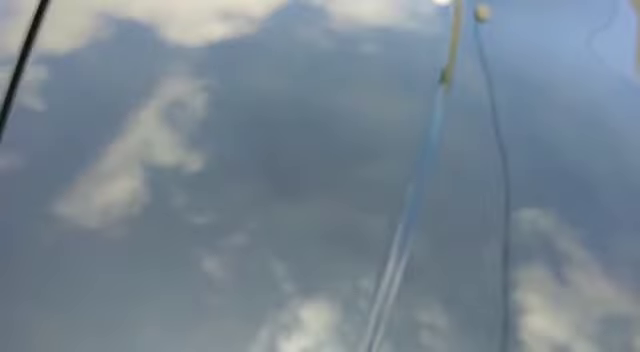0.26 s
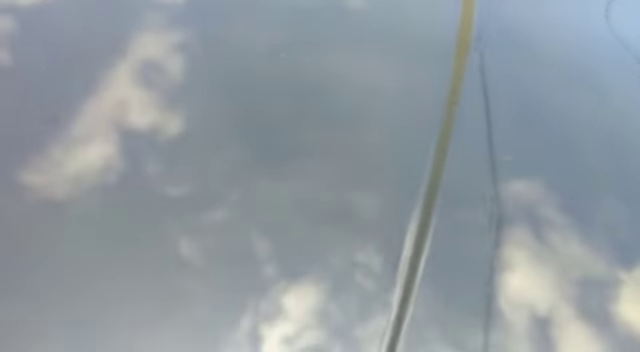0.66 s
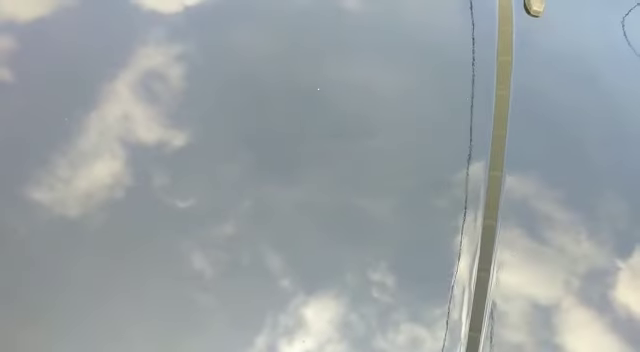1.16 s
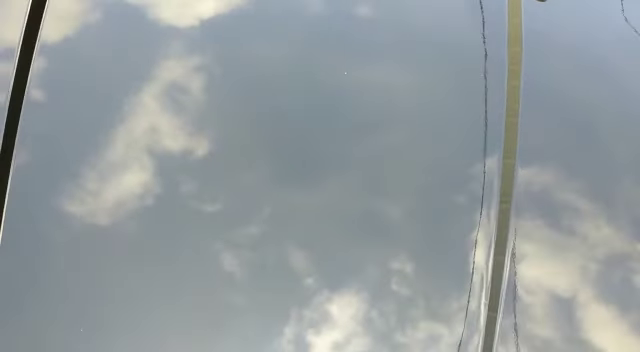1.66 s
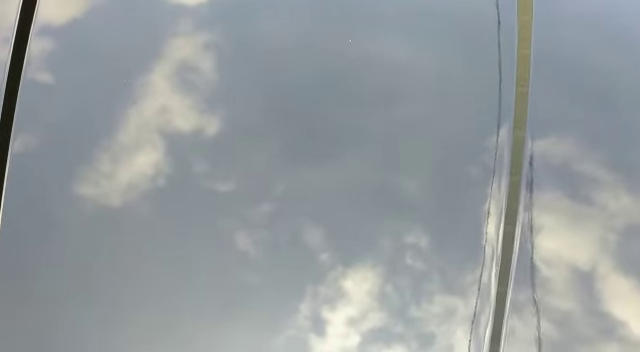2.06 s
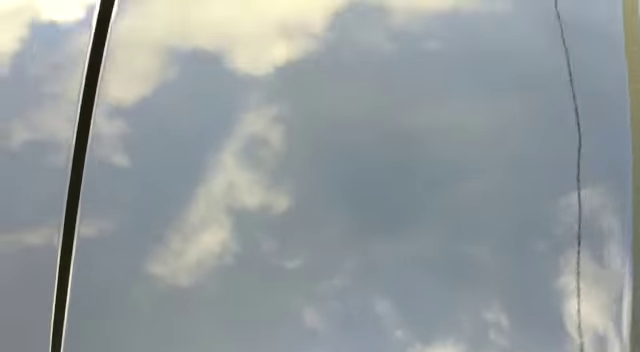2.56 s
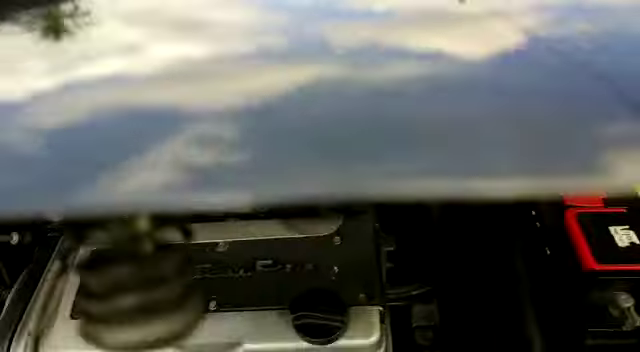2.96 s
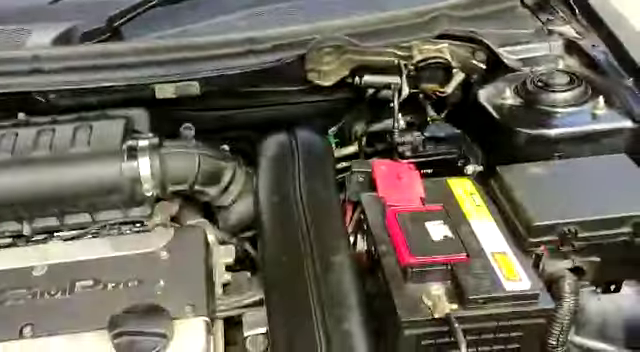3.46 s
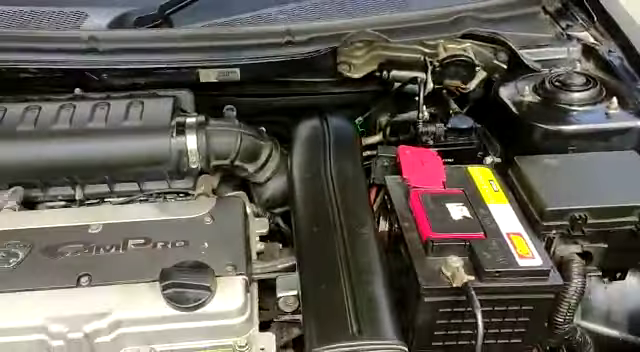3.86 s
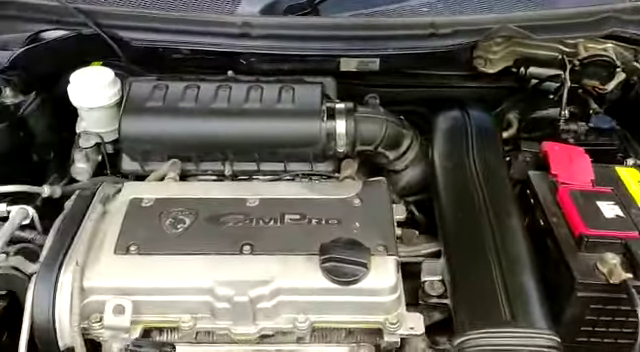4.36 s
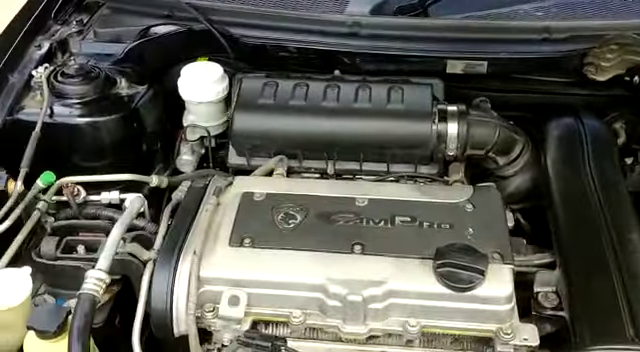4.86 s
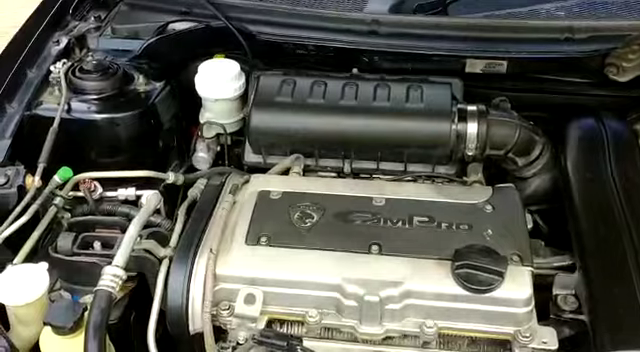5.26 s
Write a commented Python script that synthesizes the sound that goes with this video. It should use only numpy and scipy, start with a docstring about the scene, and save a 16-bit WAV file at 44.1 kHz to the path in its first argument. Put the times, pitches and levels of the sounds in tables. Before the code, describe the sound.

A car engine idles quietly throughout, a low, slightly wavering hum that creeps up very slightly, wrapped in soft rumble and airy hiss; a faint thin high hiss stops at about 3.4 s. Near 0.1 s and again near 0.57 s, fingers make short gritty scuffs with small clicks and rough whistly catches. A dull metal clunk comes at 1.2 s, then a heavier, hollow rattling blow at 1.5 s, trailing into smaller knocks and ticks until 2.1 s. A brief scrape at 2.2 s leads to the loudest burst, boomy sheet-steel bangs at 2.33-2.45 s, and another thump at 2.63 s. Faint hinge squeaks overlap these, then a short low groan at about 2.97 s. Softer clunks follow until 3.3 s. At 4 s a fading scratchy rub and light ticks pass, and only idle and hiss remain until 5.5 s. Close, outdoor, dry phone-microphone sound.

```python
"""A car idles outdoors while a hand gropes for the bonnet latch, knocks it free and lifts the lid.
From the start, harmonic orders of the firing rate hum over filtered noise: rumble, hiss and a thin high band.
From 0.1 s, gritty friction scuffs with ticks and rough whistles; then rattling blows ring the steel lid's modes.
From 2.45 s, a hinge squeaks, then groans, as gliding narrow-band noise; the thin band has gone by 3.4 s.
Late scuffs and light ticks follow at about 4 s; engine and noise continue to the end."""
import sys
import numpy as np
from scipy import signal
from scipy.fft import rfft, irfft
from scipy.io import wavfile
from scipy.ndimage import uniform_filter1d

SR = 44100
rng = np.random.default_rng(int(sys.argv[2]) if len(sys.argv) > 2 else 0)


def generate_wav(sig):
    """Save sig (samples, or channels by samples) to the path in sys.argv[1] as 16-bit PCM at SR."""
    pcm = np.round(np.clip(np.atleast_2d(sig).T, -1, 1) * 32767).astype(np.int16)
    wavfile.write(sys.argv[1], SR, pcm)


N = 242991  # samples


def undb(db):
    """Decibel scale: the amplitude ratio of a level in dB."""
    return 10 ** (np.asarray(db) / 20)


def unit(x):
    """Normalization: x scaled to an RMS value of one."""
    return x / np.sqrt(np.mean(x ** 2))


def curves(table):
    """Linear interpolation: the columns of a table joined by straight lines in time."""
    s, *columns = np.transpose(table)
    return [np.interp(np.arange(N) / SR, s, column) for column in columns]


def colour(x, points, lo=0, hi=SR):
    """Linear filtering: multiplies the spectrum of x by (Hz, dB) points, kept from lo to hi in Hz."""
    hz = np.fft.rfftfreq(len(x), 1 / SR) + 1  # the offset avoids log(0)
    point_hz, point_db = np.transpose(points)
    gain = undb(np.interp(np.log(hz), np.log(point_hz), point_db))
    passed = (hz >= lo) * (hz < hi)
    return irfft(rfft(x) * gain * passed, len(x))


def walk(rate, size=N):
    """Slow random modulation: levels held 1 / rate seconds and smoothed twice, with spread near 1."""
    hold = int(SR / rate)
    steps = np.repeat(rng.standard_normal(size // hold + 1), hold)
    smooth = uniform_filter1d(uniform_filter1d(steps, hold), hold)
    return np.sqrt(2) * smooth[:size]


def grit(shape, spread_db):
    """Random excitation: dense tiny impacts of very unequal size."""
    return rng.standard_normal(shape) * undb(spread_db * rng.exponential(size=shape))


def whistle(hz, width_hz):
    """Narrow-band noise: a random complex envelope modulates a carrier that follows hz."""
    envelope = walk(width_hz, size=len(hz)) + 1j * walk(width_hz, size=len(hz))
    carrier = np.exp(2j * np.pi * np.cumsum(hz) / SR)
    return unit(np.real(envelope * carrier))


# Idling engine. Each row: time in seconds, firing rate in Hz, levels of the 4th and 5th order in dB.
IDLE = [(0, 35.66, -58, -53.5), (.5, 36.14, -56, -43.5), (1, 36.51, -50.5, -45), (1.3, 36.86, -49, -57),
        (2.8, 37.36, -46.5, -51), (3.9, 37.62, -50, -50.5), (4.3, 37.8, -47, -42.5),
        (5.5, 38.18, -52, -46.5)]
# Its other orders. Each row: multiple of the firing rate, level in dB.
ORDERS_DB = [(2, -59.5), (2.4, -56.5), (3, -68), (3.5, -64.5), (6, -56.5), (7, -61), (8, -70)]


def engine():
    """Harmonic synthesis: orders of a slightly unsteady firing rate, each wavering in level."""
    firing_hz, *moving_db = curves(IDLE)
    phase = 2 * np.pi * np.cumsum(firing_hz * (1 + 0.0028 * walk(4.91))) / SR
    orders = ORDERS_DB + list(enumerate(moving_db, start=4))
    waver_db = 1.3
    return sum(np.sqrt(2) * undb(db + waver_db * walk(6.6)) * np.cos(k * phase) for k, db in orders)


# Noise around the car. Each row: time in seconds, level of the middle in dB, level of the treble in dB.
AIR = [(0, -54.5, -61.5), (.2, -48.5, -55), (.9, -52.5, -57.5), (1.2, -50.5, -57.5), (1.5, -54, -59.5),
       (2.1, -52, -59), (2.4, -46, -54), (2.6, -52.5, -59.5), (2.9, -44.5, -58.5), (3.05, -49.5, -55.5),
       (3.4, -47, -59.5), (3.7, -53.5, -54.5), (3.95, -53.5, -57.5), (4.15, -49, -48.5), (4.35, -53, -53),
       (5.05, -57, -62), (5.51, -55, -60.5)]
# Its spectrum, relative within each region. Each row: frequency in Hz, density in dB per Hz.
AIR_COLOUR = [(24, -50), (40, -25), (68, -25), (106, -14), (189, -7), (410, -17), (526, -25), (693, -27.5),
              (1230, -31), (1790, -30), (4090, -42), (6420, -31), (11100, -43.5), (14300, -33.5),
              (15800, -35)]
# The frequencies in Hz that part bass, middle, treble and top.
AIR_EDGES = [450, 4000, 10000]
RUMBLE_DB = -48.5  # steady part of the bass
TOP_DB, TOP_SINKS_DB_S = 3, -0.7  # top relative to the treble at the start, and its drift in dB/s
SHAKE_DB, SHAKE_T60_S = -16.5, 1  # the bass swells with the blows and dies away slowly


def air(knocks):
    """Band-filtered noise: four regions of flickering bands; the bass also carries the shaking of the car."""
    keep = undb(-120 / (SHAKE_T60_S * SR))  # per sample, acting on power
    shake_power = signal.lfilter([1 - keep], [1, -keep], knocks ** 2)
    bass_gain = np.sqrt(undb(2 * RUMBLE_DB) + undb(2 * SHAKE_DB) * shake_power)
    middle_db, treble_db = curves(AIR)
    top_db = treble_db + TOP_DB + TOP_SINKS_DB_S * np.arange(N) / SR
    gains = [bass_gain, undb(middle_db), undb(treble_db), undb(top_db)]
    edges = [20, *AIR_EDGES, SR / 2]
    out = np.zeros(N)
    for gain, lo, hi in zip(gains, edges, edges[1:]):
        band_edges = np.geomspace(lo, hi, 6)
        region = np.zeros(N)
        for low, high in zip(band_edges, band_edges[1:]):
            flicker = undb(1.8 * walk(16))
            region += flicker * colour(rng.standard_normal(N), AIR_COLOUR, low, high)
        out += gain * unit(region)
    return out


THIN_HZ, THIN_WIDTH_HZ, THIN_DB = 7470, 750, -65.5
THIN_ENDS_S = 3.4  # it stops once the lid is up


def thin_hiss():
    """Narrow-band noise: a gently flickering hiss that fades within a tenth of a second."""
    fade = np.clip((THIN_ENDS_S - np.arange(N) / SR) * 10, 0, 1)
    band = whistle(np.full(N, float(THIN_HZ)), THIN_WIDTH_HZ)
    return undb(THIN_DB + 1.9 * walk(9.05)) * fade * band


def stroke(length, rise, db, drift_db_s, release):
    """Friction envelope: a rubbing stroke rises, drifts in level and lets go exponentially."""
    t = np.arange(int((length + 7 * release) * SR)) / SR
    attack = np.minimum(t / rise, 1) ** 2
    let_go = np.exp(-np.maximum(t - length, 0) / release)
    return undb(db + drift_db_s * t) * attack * let_go


def squeal(out, s, length, rise, db, drift_db_s, start_hz, end_hz, width_hz, release):
    """Superposition: adds one gliding, flickering whistle to the layer."""
    gain = stroke(length, rise, db, drift_db_s, release)
    hz = np.interp(np.arange(len(gain)) / SR, [0, length], [start_hz, end_hz])
    flicker = undb(1.5 * walk(67.5, size=len(hz)))
    tone = gain * flicker * whistle(hz, width_hz)
    return out + np.pad(tone, (int(s * SR), N))[:N]


# Scuffs of fingers and shoes. Each row: start in seconds, length before release in seconds, rise in seconds,
# level in dB, drift in dB/s.
SCUFFS = [(0.09, 0.105, 0.018, -44, 23), (0.562, 0.069, 0.019, -31, -15), (2.214, .112, .006, -39, 10),
          (3.96, .305, 0.034, -33, -52.5)]
# Relative spectrum of each scuff, one list per scuff. Each row: frequency in Hz, density in dB per Hz.
SCUFF_COLOURS = [
    [(290, -33), (500, -14), (612, -15), (1480, -5), (1780, -17), (1970, -1), (4000, -2.5), (15800, -18)],
    [(290, -31), (500, -5), (817, -7), (1030, -1), (1440, -13), (1760, -1), (2310, -11), (2670, -5),
     (3950, -17), (5420, -8), (11200, -27), (15800, -12.5)],
    [(290, -33), (500, -5), (639, 3.5), (1010, -13), (1140, -5.5), (2670, -3.5), (7350, -19.5),
     (11300, -34), (15800, -27)],
    [(290, -43), (500, -11), (805, -10), (1220, -1.5), (1780, -13), (2310, -7), (2790, -8), (5190, -8),
     (8010, -21.5), (15800, -29)],
]
# Rough whistles where a scuff catches. Each row: start in seconds, length before release in seconds,
# rise in seconds, level in dB, drift in dB/s, start frequency in Hz, end frequency in Hz.
CATCHES = [(.094, 0.039, 0.0029, -41.5, -15, 2450, 2630), (.156, 0.015, .005, -40.5, 5, 3920, 4050),
           (.172, 0.026, .006, -44, -15, 5000, 5300), (.566, .03, 0.0046, -45, -15, 5250, 5400),
           (2.245, 0.086, 0.011, -49.5, -7, 2670, 2600), (3.98, .03, 0.0076, -39.5, -40, 2150, 2210),
           (4.032, 0.14, 0.013, -39.5, -42, 2300, 2470)]
SCUFF_RELEASE_S, CATCH_WIDTH_HZ = 0.011, 700.


def scuffs():
    """Sliding friction: coloured grit rubs, and whistles roughly where it catches."""
    out = np.zeros(N)
    for (s, *shape), points in zip(SCUFFS, SCUFF_COLOURS):
        gain = stroke(*shape, SCUFF_RELEASE_S)
        rub = unit(colour(grit(len(gain), 2.5), points))
        flicker = undb(1.4 * walk(90.7, size=len(gain)))
        out[int(s * SR):][:len(gain)] += gain * flicker * rub
    for row in CATCHES:
        out = squeal(out, *row, CATCH_WIDTH_HZ, SCUFF_RELEASE_S)
    return out


# Modes of the steel lid. Each row: frequency in Hz, relative level in dB, decay time t60 in seconds.
PANEL = [(139, -13, 0.19), (170, -1.5, 0.12), (227.9, 2, 0.092), (264.4, -0.5, 0.089), (315.5, 4, 0.062),
         (356.4, -4, 0.12), (432, 7, 0.05), (501.6, 1.5, 0.052), (604.6, -0.5, 0.052), (694.8, -1, 0.079),
         (781, -1.5, 0.057), (877, -5.5, 0.15), (988, -3.5, 0.14), (1096, -2, 0.071), (1462, 9.5, 0.0037),
         (1650, 5.5, 0.008), (1952, 1, 0.054), (2114, -2.5, 0.023), (2600, 2.5, 0.019), (3127, 5.5, 0.049),
         (3210, -8, 0.067), (4240, 10.5, 0.0049), (5360, 14, 0.005), (6980, 10.5, 0.0056),
         (10000, 1, 0.00062), (13100, 6, 0.00087)]


def panel_rings(t):
    """Modal synthesis: each mode is a decaying sine, and radiates poorly below its resonance."""
    rings = []
    for hz, db, t60 in PANEL:
        ring = undb(db) / np.sqrt(t60) * np.sin(2 * np.pi * hz * t) * undb(-60 * t / t60)
        radiation = signal.butter(3, 0.71 * hz, "high", fs=SR, output="sos")
        rings.append(signal.sosfilt(radiation, ring))
    return np.array(rings)


# Blows and clicks on panel and latch, and ticks within the scuffs. Each row: start in seconds, boom level in dB,
# then clunk, clack and crack levels in dB above the boom, favoured boom and clunk frequencies in Hz,
# base rattle t60 in seconds.
KNOCKS = [(.097, -41, -20, 3, -4, 139, 745, .065), (.122, -38, -5, -3, 7.5, 121, 705, 0.18),
          (.162, -40.5, -3, -8, 10.5, 170, 455, 0.17), (.567, -40, 11, -1, 9, 161, 920, 0.067),
          (.575, -27.5, -8, -14, -9, 180, 774, 0.098), (1.008, -32, -30, -24, -20, 320, 452, 0.035),
          (1.097, -31.5, -1, -15, -27, 331, 567, .065), (1.203, -16.5, -1, -7.5, -21, 350, 580, 0.042),
          (1.253, -24.5, -26, -26, -18, 331, 452, 0.04), (1.47, -9.5, -4, -7.5, -18.5, 254, 432, .08),
          (1.483, -13, -35, -8, -16, 226, 460, 0.06), (1.504, -16, -6, -24, -38, 234, 490, 0.25),
          (1.541, -16, -23, -5.5, -22, 234, 525, 0.075), (1.561, -16, -7, -10, -20, 221, 620, 0.064),
          (1.589, -24, -4.5, -2, -17, 168, 610, 0.048), (1.706, -24, -16, -46, -31, 222, 495, 0.12),
          (1.73, -23.5, -12, -37, -33, 226, 452, 0.11), (1.773, -30.5, -15, -9, -18, 167, 628, 0.036),
          (1.804, -28.5, -5, -31, -29, 157, 580, 0.045), (1.872, -28.5, -8.5, -7, -13, 360, 540, 0.065),
          (1.905, -41, -0.5, -1, -7, 160, 1170, .08), (1.94, -37, 0.5, 2, -3, 154, 530, 0.12),
          (1.963, -33.5, -16, -6.5, -7, 159, 455, 0.052), (1.998, -32.5, -3.5, 0, -3, 143, 794, .045),
          (2.069, -34.5, -1.5, -25, -29, 166, 440, 0.11), (2.093, -33.5, -10, -24, -25, 345, 533, 0.071),
          (2.218, -35, -20, 2, 4, 398, 1080, 0.062), (2.241, -37, -16, 4.5, 3, 140, 646, 0.24),
          (2.326, -7.5, -19, -10, -35, 193, 597, 0.087), (2.335, -5.5, -0.5, -13, -11.5, 220, 724, 0.068),
          (2.35, -16.5, 8.5, 0.5, -24, 198, 520, 0.066), (2.368, -7.5, -4, -23, -22, 218, 690, 0.053),
          (2.389, -12.5, -5, -13, -18.5, 209, 457, 0.075), (2.415, -16.5, -16, -16, -21, 250, 530, 0.084),
          (2.443, -16.5, -9, -18, -24, 303, 550, 0.041), (2.488, -25, -14, -14.5, -29, 223, 494, 0.09),
          (2.63, -7.5, -7, -11, -13, 323, 442, 0.065), (2.663, -11.5, -6, -38, -40, 270, 479, 0.044),
          (2.689, -22.5, -29, -35, -39, 290, 511, 0.057), (2.782, -37.5, 9, -2, -6, 304, 501, 0.19),
          (2.803, -23.5, 3.5, -42, -17, 393, 520, 0.15), (2.961, -37.5, 10, 2.5, -6, 167, 531.5, 0.12),
          (2.982, -29, 0, -11, -14, 333, 525, 0.13), (3.181, -37.5, -5, 2, 1, 186, 528, 0.053),
          (3.235, -26.5, -6, -28, -30, 390, 452, 0.12), (3.254, -24, -1, -24, -28, 141, 475, 0.12),
          (3.279, -28.5, -5.5, -7, -20, 250, 600, 0.19), (3.319, -35, 4, -16, -20, 121, 610, 0.17),
          (4.004, -36, 2.5, 4, 6, 189, 1200, 0.056), (4.17, -44.5, -1, -2, 3, 186, 900, .05),
          (4.259, -41.5, -2, -5, 6, 186, 608, .049)]
# The frequencies in Hz that part the registers boom, clunk, clack and crack.
PANEL_EDGES = [400, 1200, 4000]
# One entry per register: loss in dB per octave away from the favoured frequency.
FAVOUR_DB = np.array([13.5, 13.5, 17.5, 0])
# One entry per register: factor on the decay times; the clack rattles longest.
RATTLE_SHARE = [1.04, 1.06, 1.21, 0.7]
# One entry per register: factor on the rise time.
RISE_SHARE = [1.43, 0.26, 0.7, 0.075]
CLACK_HZ, RISE_S = 1770, 0.002  # favoured clack and base rise time, the same for every row
RATTLE_BEND = 1.43  # above 1: a rattle holds, then stops
SHUDDER_DB, SHUDDER_T60_S = -23, 0.54  # the loose lid shudders on after each blow; base t60


def blows(spread_db, size=2 ** 14):
    """Modal excitation: each blow or tick is a short rattle of impacts ringing four registers of modes."""
    t = np.arange(size) / SR
    out = np.zeros(N + size)
    hz = np.array([row[0] for row in PANEL])
    modes = rfft(panel_rings(t))
    register = np.digitize(hz, PANEL_EDGES)
    all_impacts = grit((len(KNOCKS), size), spread_db)
    for row, impacts in zip(KNOCKS, all_impacts):
        s, boom_db, *above_db, boom_hz, clunk_hz, rattle_t60 = row
        # the place of a blow favours the modes near it
        near_hz = np.choose(register, [boom_hz, clunk_hz, CLACK_HZ, hz])
        favour = undb(-FAVOUR_DB[register] * np.abs(np.log2(hz / near_hz)))
        for k, db in enumerate([0, *above_db]):
            body = favour[register == k] @ modes[register == k]
            rattle = undb(-60 * (t / (rattle_t60 * RATTLE_SHARE[k])) ** RATTLE_BEND)
            shudder = undb(SHUDDER_DB - 60 * t / (SHUDDER_T60_S * RATTLE_SHARE[k]))
            rise = 1 - np.exp(-t / (RISE_S * RISE_SHARE[k]))
            push = rise * (rattle + shudder)
            # the product of spectra convolves the impacts with the modes
            ring = irfft(rfft(push * impacts) * body)
            out[int(s * SR):][:size] += undb(boom_db + db) * ring / np.abs(ring).max()
    return out[:N]


# Hinge as the lid swings. Each row: start in seconds, length before release in seconds, rise in seconds,
# level in dB, drift in dB/s, start frequency in Hz, end frequency in Hz, width in Hz.
HINGE = [(2.45, .11, 0.013, -46.5, -60, 2450, 2610, 455), (2.61, .18, 0.014, -48, -8, 2440, 2750, 451),
         (2.965, .16, 0.023, -35.5, -65, 560, 571, 113)]
HINGE_RELEASE_S = 0.035


def hinge():
    """Dry-pivot friction: gliding narrow-band noise squeaks high twice, then groans low."""
    out = np.zeros(N)
    for row in HINGE:
        out = squeal(out, *row, HINGE_RELEASE_S)
    return out


def scene():
    """Superposition: everything reaches one microphone held over the bonnet."""
    knocks = blows(2.16)
    mix = engine() + air(knocks) + thin_hiss() + scuffs() + knocks + hinge()
    return mix[None]


OVERLOAD, TOP_HZ = .9, 15830  # ceiling of the rounded peaks in full-scale units; upper cutoff in Hz


def record(dry):
    """Saturation and band limiting: the phone rounds the loudest peaks and cuts the deep bass and the top."""
    rounded = OVERLOAD * np.tanh(dry / OVERLOAD)
    bass_cut = signal.butter(3, 62, "high", fs=SR, output="sos")
    top_cut = signal.ellip(10, .2, 80, TOP_HZ, fs=SR, output="sos")
    return signal.sosfilt(top_cut, signal.sosfilt(bass_cut, rounded))


dry = scene()
out = record(dry)
generate_wav(out)
```